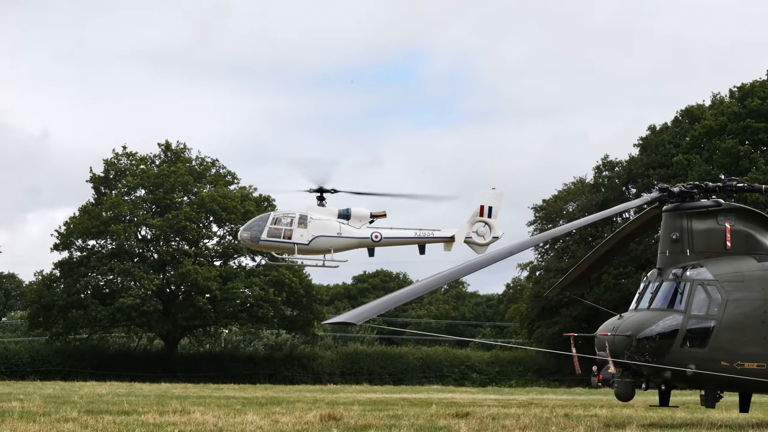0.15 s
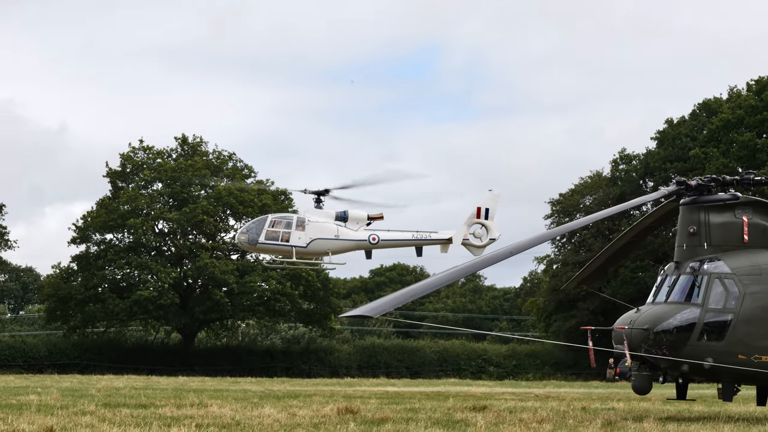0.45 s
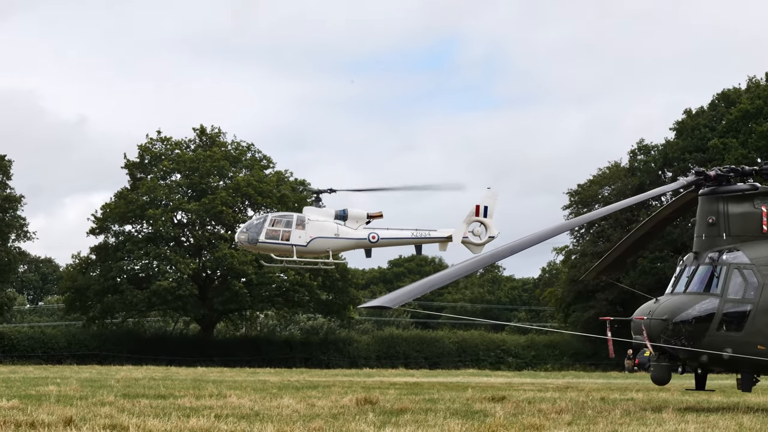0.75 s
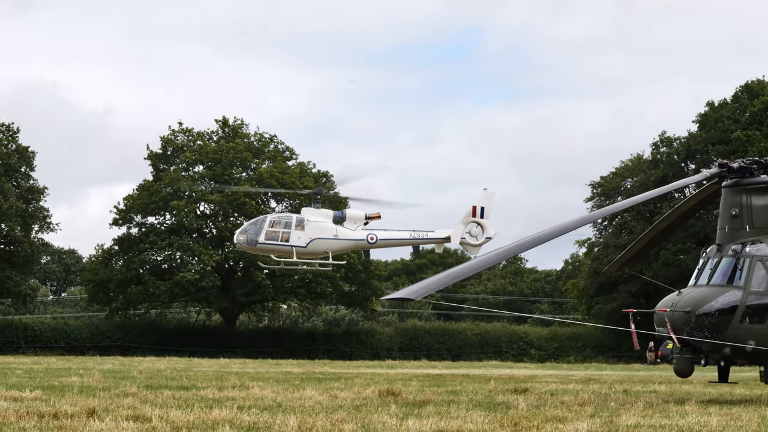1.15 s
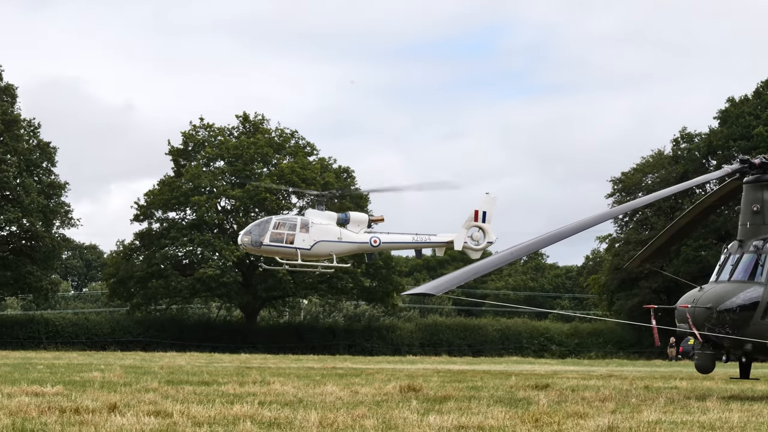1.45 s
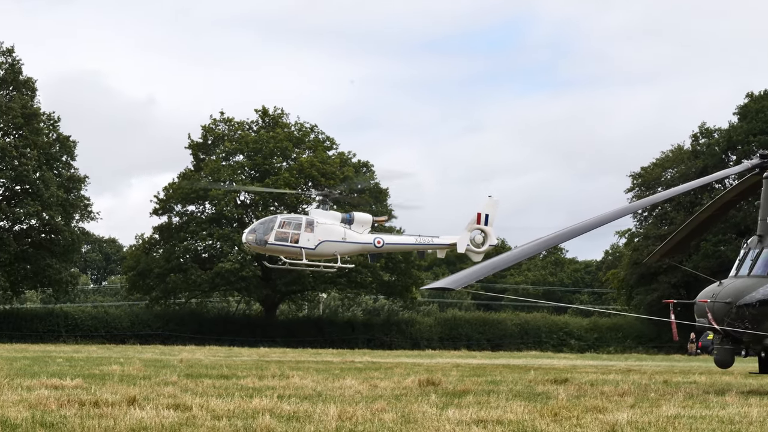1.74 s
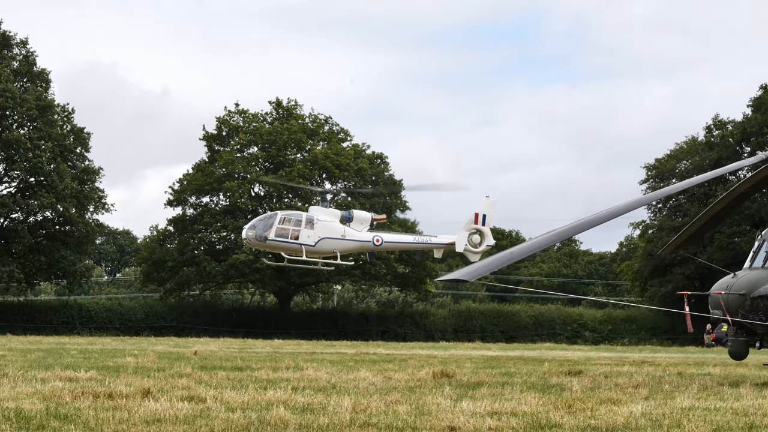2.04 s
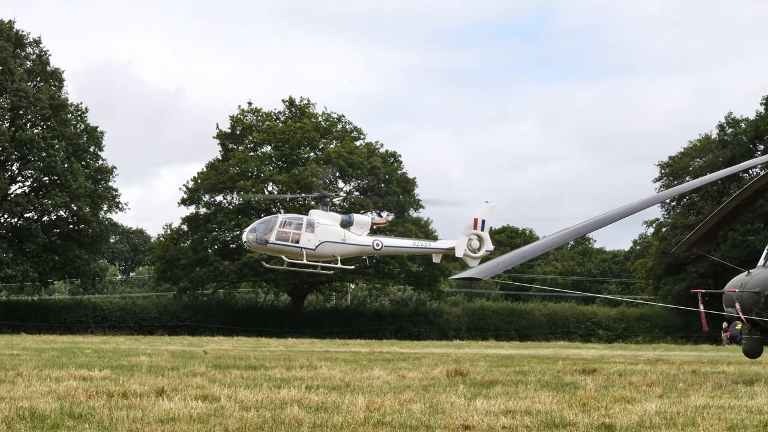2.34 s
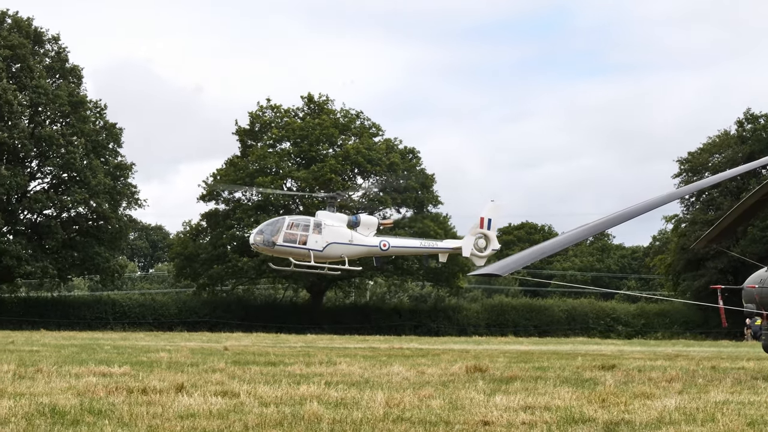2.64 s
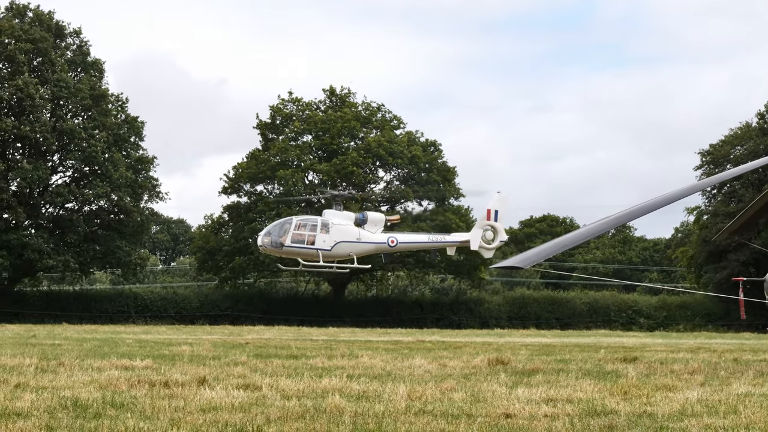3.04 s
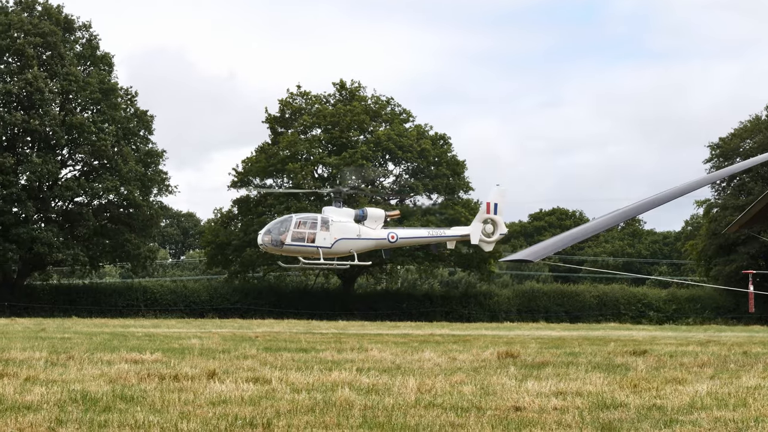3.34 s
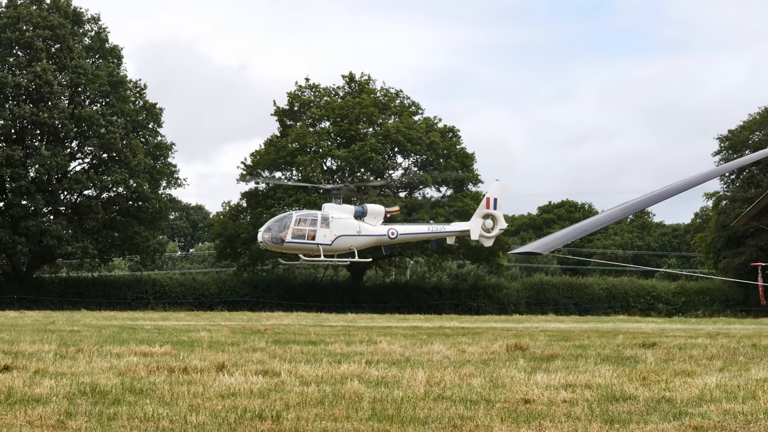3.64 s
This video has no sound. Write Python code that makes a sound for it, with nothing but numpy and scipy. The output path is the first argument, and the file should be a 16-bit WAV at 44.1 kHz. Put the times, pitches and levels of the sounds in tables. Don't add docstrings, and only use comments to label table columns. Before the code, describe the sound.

Hovering helicopter: rapid blade slaps and windy roar under a shrill, fluttering turbine whine.

```python
import sys
import numpy as np
from scipy import signal
from scipy.io import wavfile
from scipy.ndimage import uniform_filter1d

SR = 44100
rng = np.random.default_rng(int(sys.argv[2]) if len(sys.argv) > 2 else 0)


def nominal_scale(level):
    x = np.asarray(level, float) / 20
    return 10 ** x


def output_pcm(signal):
    pcm = np.clip(np.atleast_2d(signal).T, -1, 1) * 32767
    wavfile.write(sys.argv[1], SR, np.round(pcm).astype(np.int16))


N = 167139
T = np.arange(N) / SR

BLADES_PER_S, FIRST_BLADE_S = 18.83, .0155
# t/s, f/Hz
WHISTLE_PITCH = [(0, 7982), (.5, 7978), (.75, 7960), (1.2, 7946), (2.4, 7946), (2.9, 7960), (3.5, 7955),
                 (3.79, 7975)]
# t/s, level/dB
WHISTLE_LEVEL = [(0.0, -25.5), (0.28, -16.5), (0.34, -20), (0.7, -17), (1.95, -11.5), (2.09, -16.5),
                 (2.13, -14), (2.28, -15), (2.33, -10.5), (2.47, -12.5), (2.9, -9.5), (2.98, -16),
                 (3.02, -9.5), (3.69, -14.5), (3.76, -10.5), (3.79, -12)]


def rms_one(x):
    return x / np.sqrt(np.mean(np.abs(x) ** 2) + 1e-20)


def in_time(rows):
    s, *columns = np.transpose(rows)
    return [np.interp(T, s, c) for c in columns]


def drift(rate_hz):
    r = np.exp(-16 * np.pi * rate_hz / SR)
    settle = 4000
    white = rng.standard_normal(N // 8 + settle + 2)
    slow = signal.lfilter([1], [1, -2 * r, r * r], white)[settle:]
    return np.interp(np.arange(N) / 8, np.arange(len(slow)), rms_one(slow))


def scatter_path(flutter_hz):
    return (drift(flutter_hz) + 1j * drift(flutter_hz)) / np.sqrt(2)


def carry(path, hz):
    return np.sqrt(2) * np.real(path * np.exp(2j * np.pi * np.cumsum(hz + 0 * T) / SR))


def tone(hz, flutter_hz, scattered):
    share = np.clip(scattered, 0, 1)
    return carry(np.sqrt(1 - share) + np.sqrt(share) * scatter_path(flutter_hz), hz)


def chop(depth_db, lag_s):
    swell = np.cos(np.pi * BLADES_PER_S * (T - FIRST_BLADE_S - lag_s)) ** 6
    uneven = np.clip(1 + .35 * drift(4.0), 0, 2)
    return nominal_scale(depth_db * (swell - .3) * uneven)


def thump():
    level_db, fade_db_per_s, uneven_db = -38, -1, 0.5
    lead_s, swing_s = .0065, .0052
    ground_lag_s, ground_db = .0185, -6
    low_hz, high_hz = 27.3, 87
    s = FIRST_BLADE_S - lead_s + np.arange(-8, 72) / BLADES_PER_S
    size = nominal_scale(fade_db_per_s * s + uneven_db * rng.standard_normal(len(s)))
    pulses = np.zeros(N + SR)
    pulses[((s + .5) * SR).astype(int)] = size
    pulses[((s + .5 + swing_s) * SR).astype(int)] = -size
    pulses += nominal_scale(ground_db) * np.roll(pulses, int(ground_lag_s * SR))
    high_pass = signal.butter(2, low_hz, "high", fs=SR, output="sos")
    low_pass = signal.butter(2, high_hz, fs=SR, output="sos")
    bass = signal.sosfilt(np.vstack([high_pass, low_pass]), pulses + 1e-18)
    return nominal_scale(level_db) * rms_one(bass[SR // 2:SR // 2 + N])


def slaps():
    # t/s, peak level/dB, f/Hz
    vortex_hits = [(0.015, -2.5, 573), (0.068, 5, 700), (0.123, -2.5, 393), (0.171, -2, 553),
                   (0.223, -3.5, 580), (0.279, -11, 440), (0.33, -5, 750), (0.384, -4, 720), (0.4, -3, 720),
                   (0.455, -13, 666), (0.49, -5, 650), (0.91, 0, 900), (1.552, -22, 739), (1.658, -21, 594),
                   (1.711, -1.5, 700), (1.978, -13, 530), (2.089, -3, 890), (2.241, -23, 711),
                   (2.435, -8, 581), (2.716, -7, 570)]
    t60_s, attack_s, trim_db = 0.028, 0.0018, -9.5
    out, t = np.zeros(N + SR), np.arange(SR // 20) / SR
    for s, db, hz in vortex_hits:
        shape = (1 - np.exp(-t / attack_s)) * nominal_scale(-60 * t / t60_s)
        wave = shape * -np.sin(2 * np.pi * hz * t * (1 - 1.9 * t))
        start = int(s * SR)
        out[start:start + len(t)] += nominal_scale(db + trim_db) * wave / np.abs(wave).max()
    return out[:N]


def roar():
    # t/s, level/dB, brightness/dB
    wash = [(0, -21, -6), (.35, -20.5, -8.5), (.6, -21, -1.5), (.85, -18.5, -2.5), (1.2, -20, -2.5),
            (1.6, -21.5, -1.5), (2.0, -21.5, -1.5), (2.35, -23, -2), (2.7, -22, -2.5), (2.87, -23, -3),
            (2.91, -26, -2.5), (3.3, -24.5, -1.5), (3.79, -27, -0.5)]
    # f/Hz, band level/dB
    colour = [(80, -12), (180, -10.5), (400, -6.5), (600, -1), (1400, -5), (2100, -13), (6800, -19),
              (15500, -41.5)]
    patchy_db, trim_db = 1.4, 1.59
    level_db, bright_db = in_time(wash)
    colour_hz, colour_db = np.transpose(colour)
    edges = 60 * 2 ** np.arange(0, 8.2, 1 / 3)
    white = rng.standard_normal((2, N))
    together = drift(6.0)
    out = 0
    for k, (low, high) in enumerate(zip(edges, edges[1:])):
        hz = np.sqrt(low * high)
        band = signal.sosfilt(signal.butter(2, [low, high], "band", fs=SR, output="sos"), white[k % 2])
        band_db = np.interp(np.log(hz), np.log(colour_hz), colour_db)
        tilt_db = np.clip(np.log2(hz / 700), 0, 1) * (bright_db - bright_db.mean())
        flicker_db = patchy_db * (0.2 * together + drift(8.3))
        out = out + band * nominal_scale(band_db + tilt_db + flicker_db)
    blades = chop(3.5, lag_s=-0.002) * chop(1.5, lag_s=.024)
    return nominal_scale(level_db + trim_db) * rms_one(out) * blades


def tail_fan():
    # t/s, f/Hz, tone level/dB, swallowed turbulence/dB
    fan_run = [(0.0, 1255, -16, -20), (0.07, 1251, -25, -28), (0.17, 1249, -19, -23),
               (0.39, 1248, -31, -29), (0.53, 1248, -16, -21), (0.73, 1245, -14, -15),
               (1.13, 1246, -15, -18), (1.31, 1244, -21, -25), (1.45, 1240, -32, -32),
               (1.49, 1236, -24, -23), (1.6, 1245, -25, -26), (2.46, 1244, -27, -28),
               (2.68, 1246, -18, -21), (2.8, 1247, -23, -30), (3.48, 1246, -25, -30),
               (3.56, 1246, -16, -24), (3.77, 1251, -28, -33), (3.79, 1249, -19, -29)]
    # t/s, level/dB
    overtones = [(0.0, -39), (0.05, -34), (0.22, -44), (0.85, -30), (1.19, -41), (1.22, -36), (2.07, -38),
                 (2.09, -43), (2.67, -33), (3.24, -46), (3.44, -33), (3.5, -46), (3.58, -32), (3.68, -43),
                 (3.74, -33), (3.79, -41)]
    # t/s, third tone and above/dB, upper humps/dB
    upper_rows = [(0.0, -47, -27.5), (0.03, -33, -40), (0.47, -43, -36), (0.8, -16, -29), (0.84, -33, -28),
                  (0.92, -19, -27), (1.02, -25, -40), (1.19, -32, -45), (1.52, -21, -37.5),
                  (1.57, -36, -37), (1.85, -26, -34), (2.24, -31, -38.5), (2.7, -28, -33.5),
                  (2.93, -40, -42), (3.49, -27, -38.5), (3.79, -29, -39)]
    # multiple, tone level/dB, flutter/Hz, hump centre [share of tone], hump width/Hz, hump level/dB
    fan_rows = [
        (1, 0.5, 4.3, 0.955, 140, -1),
        (2, 2, 30, 0.962, 110, 2),
        (3, -5, 50, 0.955, 330, -2),
        (4, -12, 60, .95, 170, -2),
        (5, -19, 40, .952, 260, -6),
    ]
    scattered_shares = [.05, .35, .95, 1, 1]
    hz, tone_db, hump_db = in_time(fan_run)
    overtone_db, = in_time(overtones)
    third_db, upper_db = in_time(upper_rows)
    wander = .013 * drift(22)
    gusts = chop(1.04, lag_s=-0.0054) * nominal_scale(1.5 * drift(45.0))
    out = 0
    for (order, db, flutter_hz, centre, width_hz, noise_db), scattered in zip(fan_rows, scattered_shares):
        if order == 1:
            level_db, eddies_db = tone_db, hump_db
        else:
            level_db = overtone_db if order == 2 else third_db + 2.0 * drift(14.0)
            eddies_db = upper_db + 3.0 * drift(9.6)
        out = out + nominal_scale(level_db + db) * tone(order * hz, flutter_hz, scattered)
        hump = tone(order * (centre + wander) * hz, .6 * width_hz, scattered=0.88)
        out = out + nominal_scale(eddies_db + noise_db) * hump * gusts
    return out


def compressor_whistle():
    # centre t/s, peak level/dB, width/s
    flares = [(0.723, -9.1, 0.009), (0.739, -10.1, 0.013), (0.955, -10.0, 0.013), (1.176, -10.0, 0.025),
              (1.186, -8.9, 0.02), (1.619, -6.8, 0.01), (1.675, -9.4, 0.008), (1.823, -6.1, 0.006),
              (1.881, -6.3, 0.011), (1.893, -6.8, 0.005), (1.911, -8.6, 0.011), (1.955, -9.7, 0.008),
              (2.128, -10.2, 0.019), (2.302, -9.8, 0.006), (2.325, -6.2, 0.018), (2.341, -5.5, 0.017),
              (2.353, -5.1, 0.017), (2.363, -6.2, 0.005), (2.4, -7.6, 0.009), (2.415, -5.8, 0.005),
              (2.432, -9.1, 0.006), (2.475, -9.1, 0.004), (2.501, -8.5, 0.019), (2.561, -10.0, 0.012),
              (2.608, -10.1, 0.015), (2.678, -7.3, 0.01), (2.692, -7.2, 0.009), (2.717, -7.7, 0.006),
              (2.73, -8.9, 0.006), (2.761, -5.0, 0.019), (2.783, -5.2, 0.009), (2.793, -9.7, 0.006),
              (2.807, -4.2, 0.011), (2.821, -8.7, 0.014), (2.845, -8.2, 0.004), (2.861, -9.9, 0.01),
              (2.89, -3.5, 0.021), (2.912, -9.7, 0.012), (2.955, -9.4, 0.004), (3.021, -5.2, 0.014),
              (3.051, -6.2, 0.005), (3.062, -7.9, 0.005), (3.101, -8.4, 0.015), (3.113, -7.0, 0.011),
              (3.128, -6.3, 0.01), (3.142, -9.4, 0.008), (3.149, -7.4, 0.012), (3.161, -6.7, 0.008),
              (3.207, -4.2, 0.017), (3.226, -5.1, 0.021), (3.259, -8.9, 0.006), (3.342, -8.4, 0.01),
              (3.362, -8.1, 0.008), (3.375, -7.1, 0.006), (3.485, -7.9, 0.007), (3.513, -9.1, 0.013),
              (3.531, -7.5, 0.005), (3.541, -7.1, 0.007), (3.554, -6.4, 0.025), (3.752, -7.6, 0.013),
              (.13, -17, .03), (.22, -14.5, .03), (.275, -14.5, .045), (.455, -17, .025), (.505, -17, .03),
              (.643, -11.5, .025), (.667, -12, .01), (.775, -12, .012), (.8, -13, .025),
              (.845, -14.5, .035), (.89, -13, .015), (.94, -11.5, .04), (1.03, -14, .02),
              (1.055, -10.5, .013), (1.083, -11.5, .02), (1.121, -11, .028), (1.213, -12.5, .012),
              (1.25, -12.5, .022), (1.61, -8, .022), (1.7, -11.5, .025), (2.17, -11, .045)]
    flutter_hz, bed_db, ceiling = 36, -.5, 1.6
    hz, = in_time(WHISTLE_PITCH)
    level_db, = in_time(WHISTLE_LEVEL)
    flare, focus = np.zeros(N), np.zeros(N)
    for s, db, width_s in flares:
        near = slice(int((s - .08) * SR), int((s + .08) * SR))
        bump = np.exp(-np.abs((T[near] - s) / (.6 * width_s)) ** 2.6)
        flare[near] = np.maximum(flare[near], nominal_scale(db - .5) * bump)
        focus[near] = np.maximum(focus[near], bump ** .25)
    scatter = scatter_path(flutter_hz)
    size = nominal_scale(level_db + bed_db) * ceiling * np.tanh(np.abs(scatter) / ceiling)
    calm = uniform_filter1d(scatter.real, size=500) + 1j * uniform_filter1d(scatter.imag, size=500)
    bed = (1 - focus) * size * np.exp(1j * np.angle(scatter))
    return carry(bed + flare * np.exp(1j * np.angle(calm)), hz)


def blade_echo():
    # t/s, echo level/dB
    facing = [(0, -37), (.7, -34), (1.1, -30), (1.4, -26), (1.7, -27), (2.0, -28), (2.3, -36), (2.8, -32),
              (3.3, -31), (3.79, -33)]
    start_s, length_s, fall_s = .008, .024, .008
    top_hz, end_hz = 2600, -900
    tilt_db_per_khz, uneven_db = -3.5, 3.5
    hz, = in_time(WHISTLE_PITCH)
    since = (T - FIRST_BLADE_S - start_s) % (1 / BLADES_PER_S)
    shift_hz = end_hz + (top_hz - end_hz) * np.exp(-since / fall_s)
    gate = np.sin(np.pi * np.clip(since / length_s, 0, 1)) ** .5
    level_db = in_time(facing)[0] + tilt_db_per_khz * np.maximum(shift_hz, 0) / 1000
    level_db = level_db + uneven_db * drift(9.0)
    return gate * nominal_scale(level_db) * tone(hz + shift_hz, 200, scattered=.9)


def whistle_skirts():
    # offset/Hz, width/Hz, level re whistle/dB
    near_skirt = (100, 150, -12.5)
    # offset/Hz, width/Hz, level re whistle/dB
    far_skirts = [
        (247.5, 630, -17),
        (3740, 130, -35.5),
        (5450, 2500, -43),
    ]
    hz, = in_time(WHISTLE_PITCH)
    level_db, = in_time(WHISTLE_LEVEL)
    out = 0
    for offset_hz, width_hz, db in [near_skirt, *far_skirts]:
        smear = tone(hz + offset_hz, width_hz, scattered=0.97)
        out = out + nominal_scale(level_db + db) * chop(6.5, lag_s=0.0085) * smear
    return out


def turbine_shaft():
    # multiple, level/dB
    shaft_orders = [(1, -36), (2, -43), (3, -46), (4, -48), (6, -51), (8, -44), (9, -49), (10, -46),
                    (12, -50), (13, -55), (14, -50), (16, -49), (19, -61)]
    compressor_blades, flutter_share = 11, .002
    shaft_hz = in_time(WHISTLE_PITCH)[0] / compressor_blades
    level_db, = in_time(WHISTLE_LEVEL)
    swing_db = .6 * uniform_filter1d(level_db - level_db.mean(), size=SR // 2)
    out = 0
    for order, db in shaft_orders:
        flutter_hz = flutter_share * order * shaft_hz.mean()
        order_db = db + (order > 5) * swing_db
        out = out + nominal_scale(order_db) * tone(order * shaft_hz, flutter_hz, scattered=.45)
    return out


def gearbox():
    # f/Hz, level/dB
    gear_tones = [
        (1000, -36.5),
        (1821, -42),
        (3173, -48.5),
    ]
    return sum(nominal_scale(db) * tone(hz, 3.0, scattered=.3) for hz, db in gear_tones)


def buffet():
    sos = signal.butter(2, [30, 50], "band", fs=SR, output="sos")
    rumble = signal.sosfilt(sos, rng.standard_normal(N + SR))[SR:]
    return nominal_scale(-53 + 2.0 * drift(8.0)) * rms_one(rumble)


def scene():
    rotor = thump() + slaps() + roar()
    turbine = compressor_whistle() + blade_echo() + whistle_skirts() + turbine_shaft() + gearbox()
    return (rotor + tail_fan() + turbine + buffet())[None]


def top_cut(x):
    return signal.sosfilt(signal.butter(12, 15600, fs=SR, output="sos"), x)


def record(dry):
    top = nominal_scale(.05)
    return top_cut(np.clip(dry, -top, top))


dry = scene()
out = record(dry)
output_pcm(out)
```